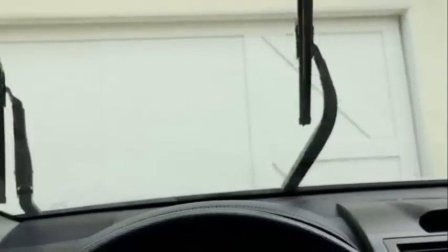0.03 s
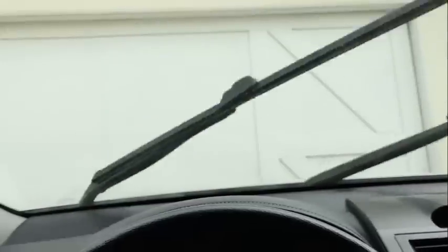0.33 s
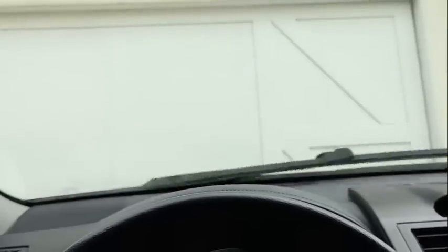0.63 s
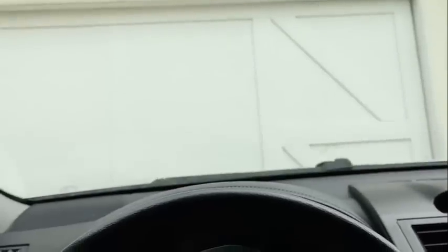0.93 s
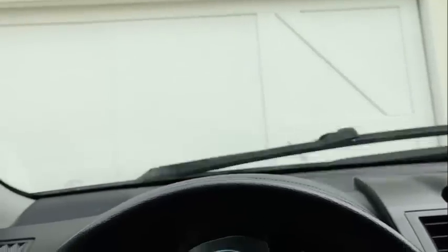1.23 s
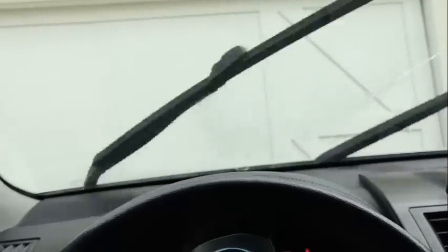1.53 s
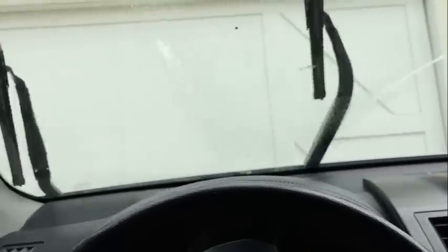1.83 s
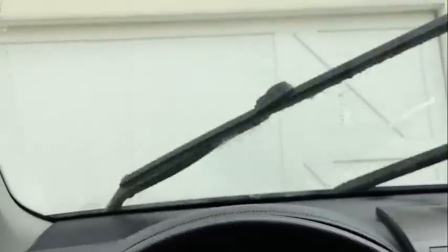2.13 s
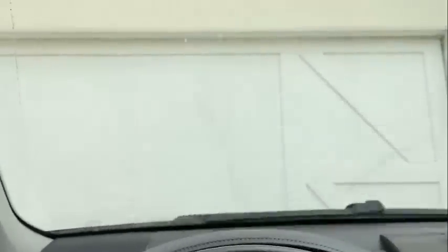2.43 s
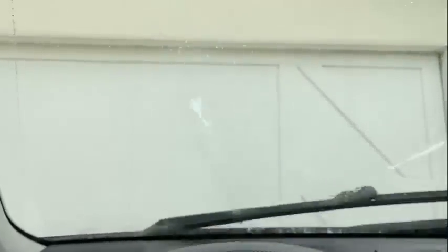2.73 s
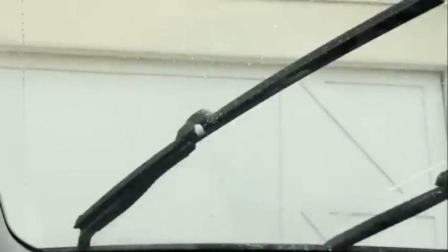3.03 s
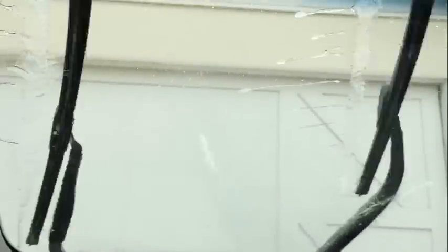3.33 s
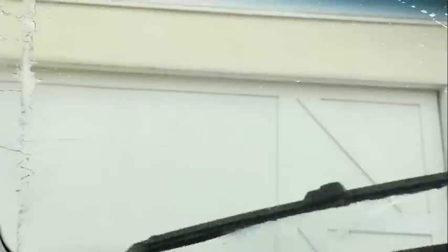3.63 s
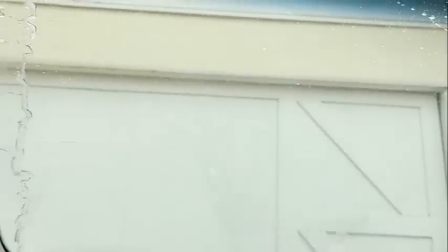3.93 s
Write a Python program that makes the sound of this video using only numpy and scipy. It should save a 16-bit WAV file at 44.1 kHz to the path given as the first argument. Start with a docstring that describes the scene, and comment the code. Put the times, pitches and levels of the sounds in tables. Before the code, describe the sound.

Car wipers sweep and thump over the glass while the engine idles low.

```python
"""Inside a parked car, a fast idle slowly settles while wiper rubber hisses with each stroke's speed.
In the first second the stalk clicks twice: the detent snaps, the lever lands, the housing rings.
From the first turn on, the blades flip over with dull thumps and the linkage rattles and knocks.
From about 2.2 s, water spatters on the windscreen."""
import sys
import numpy as np
from scipy.fft import rfft, irfft, next_fast_len
from scipy.io import wavfile
from scipy.ndimage import map_coordinates

SR = 44100
rng = np.random.default_rng(int(sys.argv[2]) if len(sys.argv) > 2 else 0)


def bounce(signal):
    """Save signal as a 16-bit WAV file at the path given by the first command-line argument."""
    frames = np.transpose(np.atleast_2d(signal))
    limited = np.clip(frames, -1, 1)
    pcm = np.round(limited * 32767).astype(np.int16)
    wavfile.write(sys.argv[1], SR, pcm)


N = 176400


def amp(db):
    """dB to gain."""
    return 10 ** (np.asarray(db) / 20)


def unit(x):
    """Scale to rms 1."""
    return x / np.sqrt(np.mean(x ** 2) + 1e-20)


def clock():
    """Sample times in s."""
    return np.arange(N) / SR


def curves(rows):
    """Each column after the time, interpolated per sample."""
    times_s, *columns = np.transpose(rows)
    return [np.interp(clock(), times_s, column) for column in columns]


def wobble(knots_per_s):
    """Smooth random curve."""
    knots = rng.standard_normal(int(4 * knots_per_s) + 8)
    return map_coordinates(knots, [clock() * knots_per_s], mode="mirror")


def colour(x, spectrum, tilt_db_oct=0, pivot_hz=6500):
    """Shape x by (f/Hz, level/dB) points and a treble tilt; rms 1."""
    hz = np.fft.rfftfreq(N, 1 / SR) + 1
    points_hz, points_db = np.transpose(spectrum)
    shape_db = np.interp(np.log(hz), np.log(points_hz), points_db)
    octaves = np.log2(np.maximum(hz / pivot_hz, 1 / 4))
    return unit(irfft(rfft(x) * amp(shape_db + tilt_db_oct * octaves), N))


def noise(spectrum, tilt_db_oct=0):
    """Coloured noise, rms 1."""
    return colour(rng.standard_normal(N), spectrum, tilt_db_oct)


def swell(start_s, rise_s):
    """Soft blow: peaks at 1 after rise_s, then dies away."""
    age = np.maximum(clock() - start_s, 0) / rise_s
    return age * np.exp(1 - np.minimum(age, 60))


def strike(start_s, rise_s, t60_s):
    """Hard blow: quick rise, exponential decay."""
    age_s = np.clip(clock() - start_s, 0, 1)
    return (1 - np.exp(-age_s / rise_s)) * np.exp(-np.log(1000) * age_s / t60_s)


def thump(start_s, db, hz):
    """A few cycles of a heavily damped panel."""
    envelope = swell(start_s, rise_s=0.0098) ** 1.88
    return amp(db) * envelope * np.sin(2 * np.pi * hz * (clock() - start_s))


def engine():
    """Firing tones and belt whine track one speed, over rumble and a whirr pulsed by the firings."""
    # idle: t/s, firing rate/Hz, level/dB
    idle = [(0, 51.74, -38), (.5, 51.41, -35.5), (1.3, 50.63, -36), (2, 49.85, -37.5), (2.7, 48.48, -38.5),
            (3.4, 46.77, -38.5), (4, 46.54, -42.5)]
    # cabin tones: multiple of firing rate, level/dB re idle
    orders = [(.5, -29), (1, 2), (1.5, -17.5), (2, -13.5), (2.5, -14), (3, -9.5), (3.5, -16), (4, -16.5),
              (5, -22), (5.5, -27.5), (6, -24.5), (7, -26.5), (10, -26)]
    # belt whine: t/s, level/dB
    whine_fade = [(0, -52.5), (.5, -55), (1.1, -62.5), (1.6, -67), (4, -87)]
    # rumble: f/Hz, level/dB
    rumble_spectrum = [(15, -38), (32, -7), (60, 0), (90, 0), (135, 2), (190, -7), (250, -12), (340, -18),
                       (430, -26.5), (700, -29), (2000, -88)]
    # engine bay through the bulkhead: f/Hz, level/dB
    whirr_spectrum = [(150, -8), (400, 2), (500, 1), (553, 5), (610, -2), (780, 0.5), (930, -2), (1380, -2),
                      (1520, -10), (1820, -7.5), (2120, -12.5), (2400, -19), (4000, -21), (6500, -26.5),
                      (10000, -30), (15000, -34)]
    firing_hz, idle_db = curves(idle)
    drift_db = idle_db - idle_db.mean()
    phase = 2 * np.pi * np.cumsum(firing_hz) / SR
    tones = np.zeros(N)
    for order, order_db in orders:
        if order == 1:
            drive_db = idle_db + .7 * wobble(12)
        else:
            drive_db = idle_db.mean() + 0.88 * drift_db + 2.6 * wobble(9)
        tones += amp(drive_db + order_db) * np.sin(order * phase + 2 * np.pi * rng.random())
    whine_db, whine_order = curves(whine_fade)[0], 9.03
    whine = amp(whine_db + 2.8 * wobble(10)) * np.sin(whine_order * phase + 1.2 * wobble(18))
    whine += amp(whine_db - 11) * np.sin(3 * whine_order * phase + .5 * wobble(25.2))
    rumble = amp(-42 + 0.2 * drift_db) * noise(rumble_spectrum)
    pulsing = 1 + 0.083 * np.sin(phase)
    whirr = amp(-55.5 + 0.2 * wobble(22)) * pulsing * noise(whirr_spectrum)
    return tones + whine + rumble + whirr


def blades():
    """Rubber hiss swells with blade speed and eases off through the turns."""
    # strokes: start/s, fastest/s, end/s, crest level/dB, tilt/(dB/oct), swell from ends to crest/dB
    strokes = [(-.5, -0.094, 0.063, -56, 2.5, 4), (0.166, .4, 0.832, -61, 2.3, 0.5),
               (1.21, 1.83, 1.976, -57.5, 1, 7.5), (1.993, 2.45, 2.633, -58, -1.6, 3),
               (2.67, 3.21, 3.47, -60, -1.5, 5.5), (3.416, 3.72, 4.1, -60.5, -1.5, 5)]
    # rubber on glass: f/Hz, level/dB
    rubber_spectrum = [(300, 2), (1200, 4), (2500, -2.5), (4000, 1.5), (6000, 3), (7800, 0), (10000, -2.5),
                       (12500, -9), (15000, -14)]
    turn_s = .11
    hiss, t = np.zeros(N), clock()
    for start_s, fastest_s, end_s, db, tilt_db_oct, swell_db in strokes:
        ramp = np.interp(t, [start_s, fastest_s, end_s], [0, 1, 0])
        speed = np.sin(np.pi / 2 * ramp) ** 1.9
        inside_s = np.minimum(t - start_s, end_s - t)
        moving = np.sin(np.pi / 2 * np.clip(.5 + inside_s / turn_s, 0, 1))
        hiss += moving * amp(db + swell_db * (speed - 1)) * noise(rubber_spectrum, tilt_db_oct)
    return hiss * amp(0.39 * wobble(9.8))


def stalk():
    """The detent scrapes and snaps, then the lever lands; both blows ring the plastic housing."""
    # clicks: snap t/s, snap level/dB, landing t/s, landing level/dB
    clicks = [(0.0369, -29, .0503, -35.5), (0.565, -29, .5725, -27)]
    # bright detent snap: f/Hz, level/dB
    snap_spectrum = [(300, -32), (1500, -14), (2400, 1.5), (3300, 4), (4200, -2), (5500, -1), (7400, -0.5),
                     (8800, -11.5), (10300, -16.5), (11500, -17), (15000, -22)]
    # duller lever landing: f/Hz, level/dB
    landing_spectrum = [(60, -13), (200, -2), (400, -1.5), (620, -6), (850, -0.5), (2000, -5), (2800, -11),
                        (6000, -17.5), (8200, -21), (9200, -27), (15000, -38)]
    # steering column housing: f/Hz, relative level/dB, t60/s
    housing_modes = [(389, 9, .07), (425, 5, 0.086), (900, 2.5, .085), (1259, -4, 0.2), (1725, -7, 0.15),
                     (2000, -3, 0.058), (2330, -8, 0.099), (2600, -13, 0.12), (3050, -15, 0.069),
                     (3150, -8, 0.056), (3360, -4, 0.06), (3600, -7, 0.073), (5240, -18, .08),
                     (6040, -10, 0.061), (6970, -18, .08), (7500, -8, .06)]
    # lever at its stop: t/s, level/dB, f/Hz
    stop_thud = (.592, -27, 120)
    snap_rise_s, snap_t60_s, scrape_lead_s = 0.0018, 0.045, 0.0057
    land_rise_s, land_t60_s, housing_db = 0.00032, 0.071, -11
    snap, landing = noise(snap_spectrum), noise(landing_spectrum)
    out = thump(*stop_thud)
    for snap_s, snap_db, land_s, land_db in clicks:
        scrape = amp(-16) * strike(snap_s - scrape_lead_s, snap_rise_s, snap_t60_s)
        out += amp(snap_db) * (scrape + strike(snap_s, snap_rise_s, snap_t60_s)) * snap
        out += amp(land_db) * strike(land_s, land_rise_s, land_t60_s) * landing
        for hz, mode_db, t60_s in housing_modes:
            ring = amp(land_db) * strike(land_s, land_rise_s, t60_s)
            if hz > 2200:  # the snap rings only the upper modes
                ring += amp(snap_db - 6) * strike(snap_s, snap_rise_s, t60_s)
            out += amp(housing_db + mode_db) * ring * np.sin(2 * np.pi * (hz * clock() + rng.random()))
    return out


def linkage():
    """Each blade flips with a thump and a rattle; light knocks and ticks fall in between."""
    # blade flips: t/s, thump level/dB, f/Hz, rattle level/dB
    flips = [(.138, -25.5, 163, -49), (.174, -22.5, 161.3, -62), (1.238, -23.5, 190, -46.5),
             (1.261, -25, 126, -69), (1.966, -27.5, 144, -44.5), (2.019, -30, 131, -58),
             (2.685, -34.5, 171, -46), (2.71, -24, 132, -72), (3.401, -34.5, 164, -48.5)]
    # linkage rattle: f/Hz, level/dB
    rattle_spectrum = [(60, -37), (250, 16.5), (420, 11.5), (650, 3.5), (1000, -1), (1700, -2),
                       (2500, -18.5), (3700, -14.5), (6000, -25), (15000, -69)]
    # linkage knocks: t/s, level/dB
    knock_events = [(.762, -47.5), (1.352, -53), (3.935, -49.5)]
    # knock: f/Hz, level/dB
    knock_spectrum = [(150, -26), (400, -3), (1200, -5), (2200, -16), (4000, -32.5), (12000, -38)]
    # ticks of the parked blades: t/s, level/dB
    tick_events = [(0.878, -59.5), (1.155, -70)]
    # thin tick: f/Hz, level/dB
    tick_spectrum = [(2000, -26), (6000, -14), (9000, -8), (10800, 1), (11600, -11), (12500, -14),
                     (15000, -20)]
    # bulkhead rocked at the bottom of travel: t/s, level/dB, f/Hz
    bulkhead_thuds = [(1.234, -26, 70), (2.708, -22.5, 79)]
    thumps = sum(thump(s, db, hz) for s, db, hz, _ in flips)
    thuds = sum(thump(*row) for row in bulkhead_thuds)
    rattle = noise(rattle_spectrum) * sum(amp(db) * swell(s, rise_s=0.012) for s, _, _, db in flips)
    knocks = noise(knock_spectrum) * sum(amp(db) * swell(s, rise_s=.005) for s, db in knock_events)
    ticks = noise(tick_spectrum) * sum(amp(db) * swell(s, rise_s=0.0039) for s, db in tick_events)
    return thumps + thuds + rattle + knocks + ticks


def water():
    """Bursts of fine, clumped drops hit the glass in a wash of spray."""
    # spatters: centre t/s, Gaussian sigma/s, level/dB, tilt/(dB/oct)
    spatters = [(2.206, 0.025, -54.5, 2.5), (2.39, 0.04, -58.5, 0), (3.002, 0.0088, -59.5, 1),
                (3.102, 0.018, -56.5, -2.5), (3.637, 0.057, -57, 2), (3.814, 0.043, -55.5, -1.2)]
    # spray on glass: f/Hz, level/dB
    spray_spectrum = [(500, 0), (1500, 9), (2400, -4), (3300, 1), (4800, 1), (7000, -2), (10000, -15.5),
                      (15000, -21)]
    drops_per_s, clumps_per_s, clump_db = 830, 74, 2
    drops = (rng.random(N) < drops_per_s / SR) * rng.standard_normal(N)
    wash = 0.82 * rng.standard_normal(N)
    spray = (unit(drops) + wash) * amp(clump_db * wobble(clumps_per_s))
    out = np.zeros(N)
    for centre_s, sigma_s, db, tilt_db_oct in spatters:
        burst = np.exp(-.5 * ((clock() - centre_s) / sigma_s) ** 2)
        out += amp(db) * burst * colour(spray, spray_spectrum, tilt_db_oct)
    return out


def scene():
    """Mono mix at the driver's seat."""
    return (engine() + blades() + stalk() + linkage() + water())[None]


def record(dry):
    """Brick-wall low-pass."""
    top_hz = 15300
    n_fft = next_fast_len(N + SR // 2)
    passband = np.fft.rfftfreq(n_fft, 1 / SR) < top_hz
    return irfft(rfft(dry, n_fft) * passband, n_fft)[..., :N]


dry = scene()
out = record(dry)
bounce(out)
```